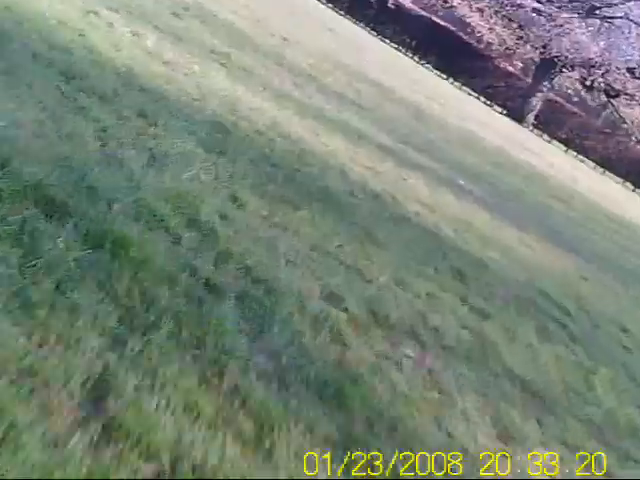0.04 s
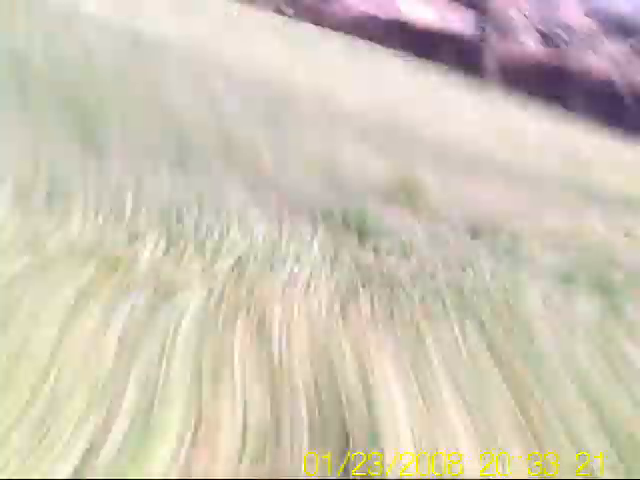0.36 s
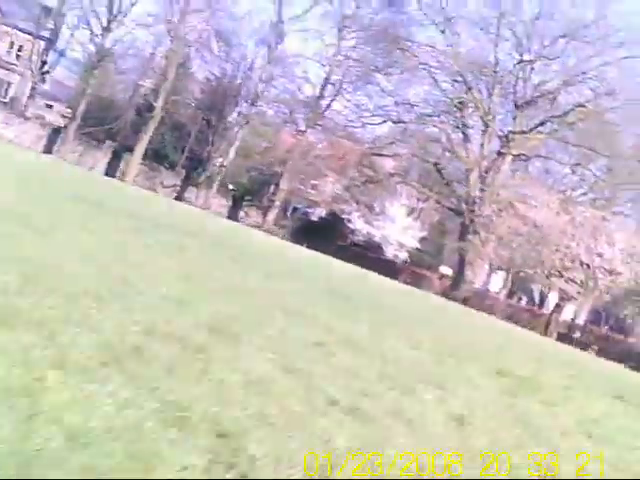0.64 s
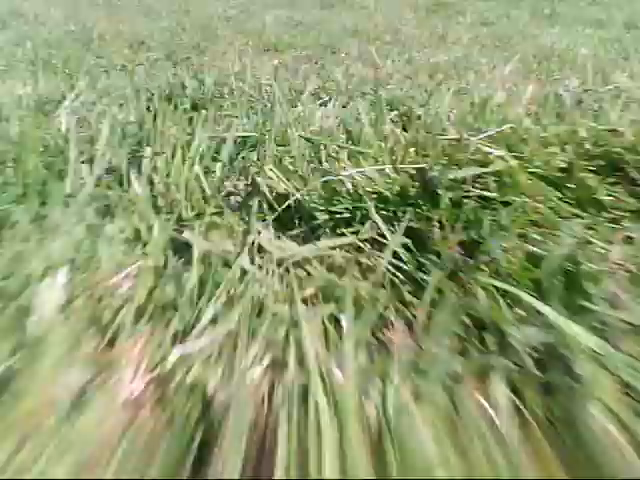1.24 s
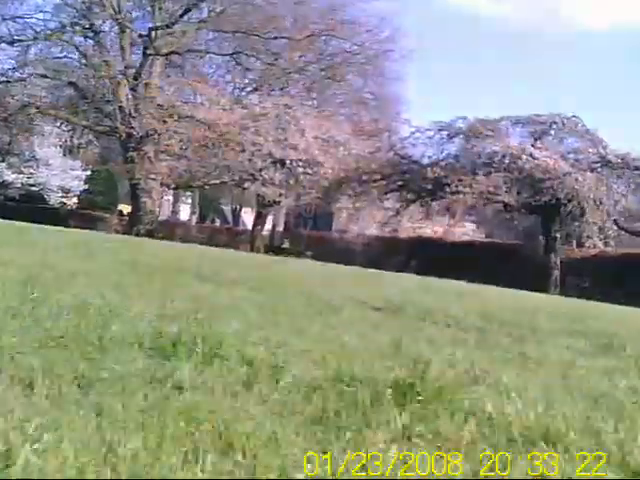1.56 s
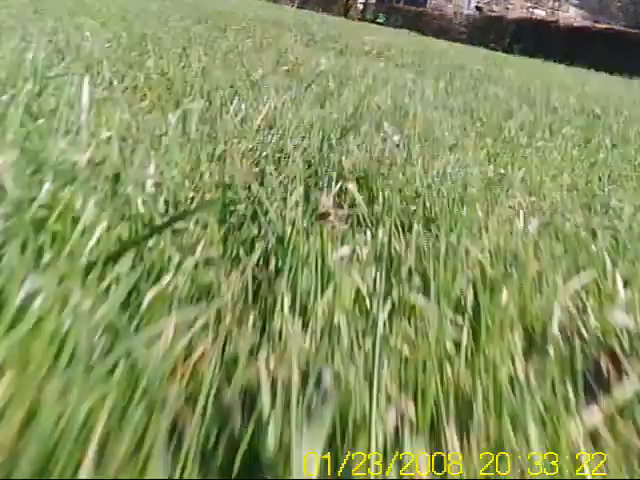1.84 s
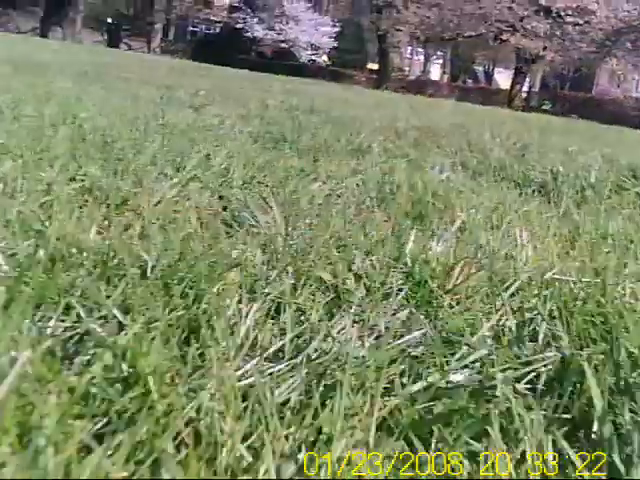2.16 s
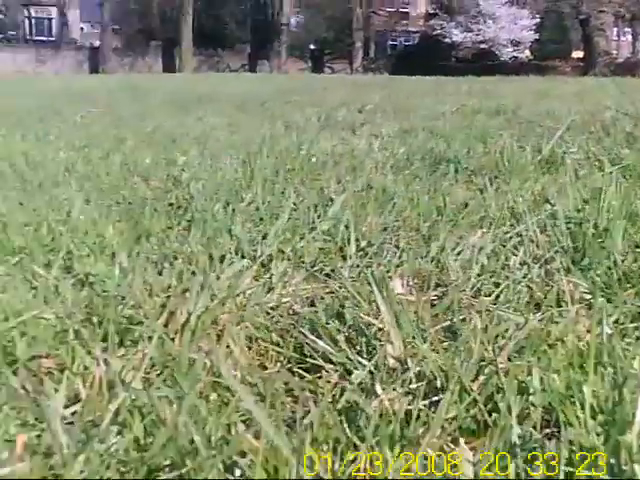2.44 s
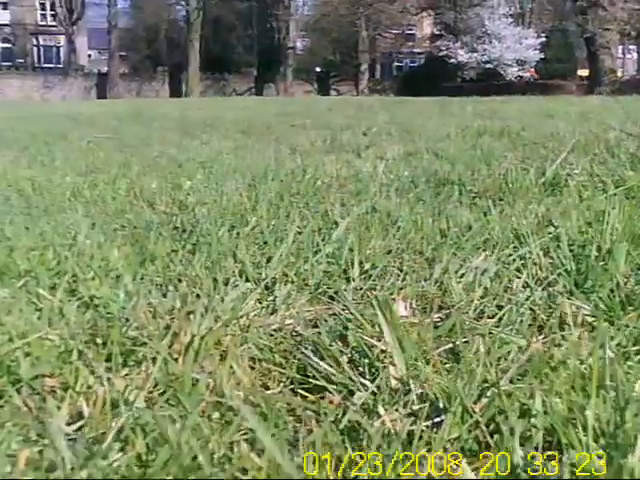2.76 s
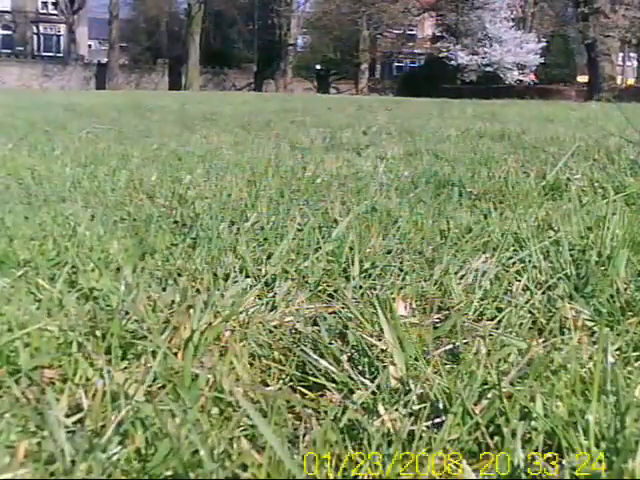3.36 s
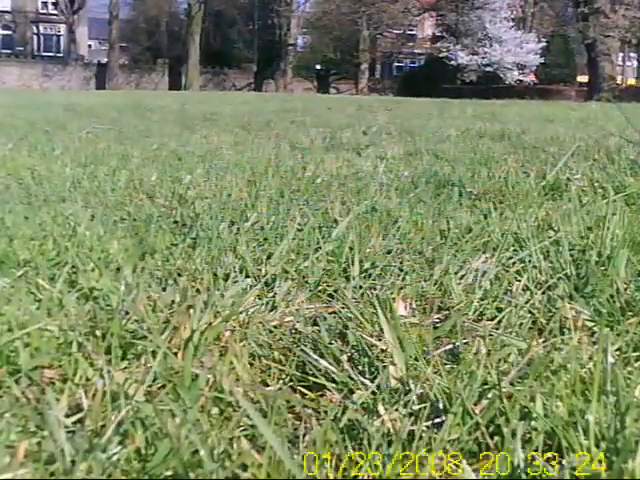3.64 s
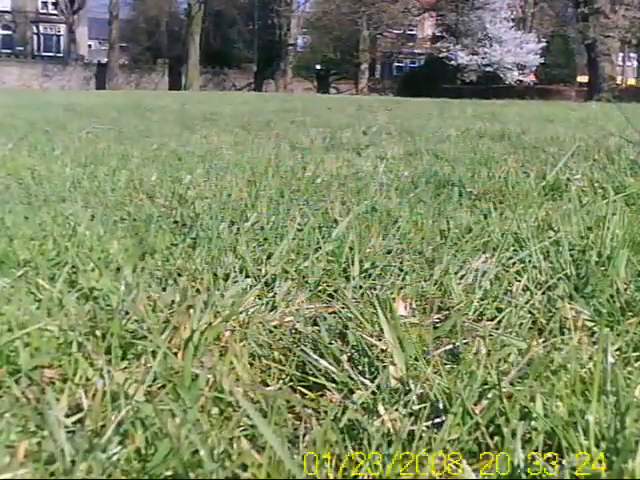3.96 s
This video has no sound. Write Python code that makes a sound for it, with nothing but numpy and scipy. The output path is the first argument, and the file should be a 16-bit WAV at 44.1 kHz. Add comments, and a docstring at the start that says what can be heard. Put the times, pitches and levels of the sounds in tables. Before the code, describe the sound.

Model aircraft landing hard on grass, with rushing wind, two skips and a short slide.

```python
"""A model plane lands on a lawn

Heard from a camera on board. Air buffets the microphone while the belly brushes the grass tips, hits
the turf, skips, hits again and slides to a stop. Stalks and clods knock on the body, and servos (small
steering motors) twitch. The camera adds a low electric flutter, hiss and one sharp tick."""
import sys
import numpy as np
from scipy import signal
from scipy.fft import rfft, irfft, next_fast_len
from scipy.io import wavfile
from scipy.ndimage import map_coordinates

SR = 44100
rng = np.random.default_rng(int(sys.argv[2]) if len(sys.argv) > 2 else 0)


def wav_out(sig):
    """Save sig, one row per channel (or a flat mono array), as 16-bit PCM at SR to the path in sys.argv[1]."""
    wavfile.write(sys.argv[1], SR, np.round(np.clip(np.atleast_2d(sig).T, -1, 1) * 32767).astype(np.int16))


N = 176400
T = np.arange(N) / SR


def amp(db):
    """Turn decibels into a volume multiplier."""
    return 10 ** (np.asarray(db) / 20)


def unit(x):
    """Scale a signal to an average strength (rms) of 1."""
    return x / np.sqrt(np.mean(x ** 2) + 1e-20)


def level(rows):
    """A volume curve through (time, level) points, silent outside them."""
    times, db = np.transpose(rows)
    return amp(np.interp(T, times, db, left=-120, right=-120))


def wobble(rate):
    """A smooth curve through `rate` random values a second."""
    return map_coordinates(rng.standard_normal(int(N * rate / SR) + 4), [T * rate])


def filtered(x, response):
    """Multiply each frequency in x by response(frequency)."""
    size = next_fast_len(N + SR // 2)
    return irfft(rfft(x, size) * response(np.fft.rfftfreq(size, 1 / SR)), size)[:N]


def coloured(x, colour):
    """Give x a colour (its balance of low and high frequencies), at strength 1."""
    freqs, db = np.transpose(colour)
    return unit(filtered(x, lambda hz: amp(np.interp(np.log(hz + 1), np.log(freqs), db))))


def noise(colour):
    """Steady noise with the given colour."""
    return coloured(rng.standard_normal(N), colour)


def grains(per_s, spread_db, smooth_db):
    """Tiny random impacts over a smooth rub."""
    hits = (rng.random(N) < per_s / SR) * rng.choice([-1, 1], N)
    sizes = amp(spread_db * np.clip(rng.standard_normal(N), -2, 2))
    return unit(unit(hits * sizes) + amp(smooth_db) * rng.standard_normal(N))


def strokes(rows, edge_s):
    """A volume curve that fades in and out for each (start, length, level) row."""
    curve = np.zeros(N)
    for start, length, db in rows:
        ramp = np.clip(np.minimum(T - start, start + length - T) / edge_s, 0, 1)
        curve += amp(db) * np.sin(np.pi / 2 * ramp) ** 2
    return curve


# Loudness of the rushing air and of its low buffeting (time [s], level [dB])
RUSH_LEVELS = [(0, -31.5), (.06, -33.5), (.25, -29), (.34, -28.5), (.40, -30.5), (.53, -27.5), (.64, -37),
               (.78, -39.5), (.87, -42), (1.0, -41.5), (1.2, -37), (1.3, -39.5), (1.42, -38), (1.6, -50),
               (1.7, -34), (1.85, -48), (2.1, -53), (2.5, -63)]
BUFFET_LEVELS = [(0, -15.5), (.08, -23), (.28, -22.5), (.38, -11.5), (.5, -16.5), (.66, -17), (.71, -22.5),
                 (.92, -32.5), (1.1, -29), (1.22, -24.5), (1.3, -16.5), (1.38, -22.5), (1.62, -38),
                 (1.71, -22.5), (1.9, -31.5), (2.1, -33.5), (2.5, -65)]
# Their colours (frequency [Hz], relative level [dB])
RUSH_COLOUR = [(60, -12.5), (130, 1.5), (220, -1), (400, -7.5), (700, -16.5), (1400, -22), (2500, -31.5),
               (4000, -40.5), (6000, -53.5), (15000, -74.5)]
RUMBLE_COLOUR = [(5, 13.5), (20, -4.5), (60, -3), (110, -13), (200, -19), (500, -57), (2000, -100)]

def wind():
    """Swirling air rushes past the microphone and shakes it, dying away as the plane slows."""
    rush = noise(RUSH_COLOUR) * level(RUSH_LEVELS) * amp(0.66 * wobble(25) + 1.8 * wobble(140))
    buffeting = noise(RUMBLE_COLOUR) * level(BUFFET_LEVELS) * amp(1.2 * wobble(22))
    return rush + buffeting


# Tones in the flutter (multiple of the lowest tone, relative level [dB])
FLUTTER_TONES = [(1, 4.5), (2, -1.5), (3, -12.5), (4, -25), (5, -31.5), (6, -43.5)]
# Colour of the hiss (frequency [Hz], relative level [dB])
HISS_COLOUR = [(35, -43), (60, 0), (139, -6), (171, -15.5), (298, -19.5), (327, -22), (403, -24),
               (613, -31.5), (688, -29.5), (3580, -43), (4030, -40.5), (15500, -49.5)]

def camera_noise(flutter_hz=23.47, whine_hz=3840):
    """The camera's electronics make an uneven low flutter, a hiss and a faint whine."""
    cycles = flutter_hz * T + .13 * wobble(7)
    flutter = np.zeros(N)
    for multiple, db in FLUTTER_TONES:
        volume = amp(db + 0.65 * wobble(7.6))
        flutter += volume * np.sin(2 * np.pi * multiple * (cycles + 0.0475 * wobble(15)))
    whine = filtered(rng.standard_normal(N), lambda hz: np.exp(-((hz - whine_hz) / 70) ** 2))
    hiss = noise(HISS_COLOUR) * amp(-46.5 + 0.98 * wobble(12))
    return amp(-34) * unit(flutter) + hiss + amp(-81) * unit(whine)


# Light touches of the grass (start [s], length [s], level [dB])
TIP_TOUCHES = [(.11, 0.23, -53.5), (.905, .15, -44), (1.092, 0.16, -45), (1.60, 0.094, -55)]
# Their colour (frequency [Hz], relative level [dB])
TIP_COLOUR = [(500, -10.5), (1200, -7.5), (1850, 2.5), (2900, -8.5), (4100, -7.5), (4800, -11),
              (6200, -8.5), (9000, -14), (11000, -21.5), (13000, -19), (15500, -17)]

def grass_tips():
    """Grass tips brush the belly as it skims over them."""
    rustle = coloured(grains(per_s=5000, spread_db=3.5, smooth_db=-4), TIP_COLOUR)
    return rustle * strokes(TIP_TOUCHES, edge_s=0.057) * amp(1.1 * wobble(80))


def scrape(levels, colour, blades, rough_db, treble_hz=3000, sway_db=1.33):
    """Grass blades flick along the belly, in tufts that rasp more or less brightly."""
    rub = coloured(blades, colour)
    treble = filtered(rub, lambda hz: hz ** 4 / (hz ** 4 + treble_hz ** 4))
    rub = unit(rub - treble + treble * amp(sway_db * wobble(35)))
    roughness = amp(rough_db * unit(wobble(70) + wobble(260)))
    return rub * level(levels) * roughness


# Loudness of the three scrapes on the turf (time [s], level [dB])
FIRST_HIT_LEVELS = [(.296, -45.5), (.304, -24), (.318, -18), (.335, -15.5), (.352, -15), (.363, -21),
                    (.392, -37.5), (.425, -37), (.455, -42.5), (.47, -67)]
SECOND_HIT_LEVELS = [(1.24, -50), (1.256, -43), (1.272, -23), (1.298, -14.5), (1.318, -22), (1.345, -35.5),
                     (1.40, -40.5), (1.445, -42.5), (1.50, -51), (1.53, -62)]
LAST_SLIDE_LEVELS = [(1.69, -49.5), (1.734, -28.5), (1.816, -20.5), (1.828, -20.5), (1.842, -25.5),
                     (1.9, -27.5), (2.025, -25.5), (2.138, -34), (2.21, -28), (2.27, -33), (2.32, -33.5),
                     (2.38, -36.5), (2.45, -46), (2.53, -66)]
# Their colours: the faster, the brighter (frequency [Hz], relative level [dB])
FIRST_HIT_COLOUR = [(94, -28.5), (160, 0.5), (319, -9), (409, -4), (544, -18.5), (635, -9.5), (1020, -12),
                    (2160, -2.5), (2380, -5), (7070, -10.5), (8730, -19), (9610, -19.5), (13300, -21.5),
                    (14600, -18.5), (15500, -20.5)]
SECOND_HIT_COLOUR = [(120, -32), (200, -6), (479, -4.5), (544, -12.5), (607, -3), (742, -13.5),
                     (1010, -5.5), (1260, -6), (1380, 0.5), (2170, -0.5), (2900, -5), (3480, -4.5),
                     (6240, -9.5), (8350, -19.5), (15500, -23.5)]
LAST_SLIDE_COLOUR = [(130, -43), (220, -13.5), (293, -9.5), (389, -8), (607, -12.5), (663, -9.5),
                     (882, -13), (1330, -5), (1480, -2), (1930, -2.5), (2520, -1), (2860, -10),
                     (3350, -3.5), (5230, -12), (6480, -9.5), (7340, -16), (11100, -26.5), (14700, -20.5),
                     (15500, -22.5)]

def belly_scrapes():
    """The belly skips off the turf twice, then slides to a stop."""
    first = scrape(FIRST_HIT_LEVELS, FIRST_HIT_COLOUR,
                   grains(per_s=4400, spread_db=0, smooth_db=-3.5), rough_db=1.5)
    second = scrape(SECOND_HIT_LEVELS, SECOND_HIT_COLOUR,
                    grains(per_s=3000, spread_db=5, smooth_db=0), rough_db=1.54)
    slide = scrape(LAST_SLIDE_LEVELS, LAST_SLIDE_COLOUR,
                   grains(per_s=2800, spread_db=3, smooth_db=-3.5), rough_db=0.33)
    return first + second + slide


# The belly presses into the turf (time [s], relative level [dB])
TURF_PUSHES = [(0.344, -16.5), (1.299, -20), (1.827, -26.5)]
# Colour of the thump (frequency [Hz], relative level [dB])
TURF_COLOUR = [(30, 5), (70, -2), (110, -6), (180, -5), (330, -9), (520, -22.5), (1200, -51.5)]

def thumps(width_s=.014):
    """A short, dull push each time the belly digs in."""
    swells = sum(amp(db) / 2 * np.exp(-((T - at) / width_s) ** 2 / 2) for at, db in TURF_PUSHES)
    return noise(TURF_COLOUR) * swells


# Hits from stalks and clods (time [s], peak level [dB], treble limit [Hz])
BODY_HITS = [(0.3464, 1, 15000), (0.3718, -6, 8000), (.383, -8.5, 12000), (.407, -17.5, 6000),
             (.4185, -20, 5100), (0.5421, -27, 3240), (.722, -41, 1790), (1.095, -40, 3030),
             (1.2407, -25.5, 3010), (1.3512, -9, 6500), (1.3794, -19, 4000), (1.392, -18, 3970),
             (1.62, -39.5, 2500), (1.638, -37.5, 4500), (1.682, -37, 3500), (1.70, -21, 2540),
             (1.8249, -7, 5000), (1.832, -14, 3004)]
# Tones the plane's body rings with (frequency [Hz], relative level [dB])
BODY_TONES = [(1560, -3), (1940, -8), (2200, -0.5), (2610, -3.5), (3450, -11), (3920, -8), (6200, -8)]

def knocks(ring_s=.010, crack_s=.006, rise_s=.00031, bass_limit_hz=708.4):
    """Each stalk or clod makes a crack and rings the body briefly; soft hits are dull."""
    track = np.zeros(N + SR)
    t = T[:SR // 25]
    for start, peak_db, treble_limit_hz in BODY_HITS:
        ring = sum(amp(db + 2 * rng.normal()) * np.sin(2 * np.pi * (hz * t + rng.random()))
                   for hz, db in BODY_TONES)
        ring = unit(ring) * amp(-60 * t / ring_s)
        crack = amp(5.5 - 60 * t / crack_s) * rng.standard_normal(len(t))
        hit = (ring + crack) * (1 - np.exp(-t / rise_s))
        band = signal.butter(2, [bass_limit_hz, treble_limit_hz], 'bandpass', fs=SR, output='sos')
        hit = signal.sosfilt(band, hit)
        track[round(start * SR):][:len(t)] += amp(peak_db) * hit / np.abs(hit).max()
    return track[:N]


# Servo twitches (start [s], length [s], level [dB])
SERVO_MOVES = [(.776, .06, -53), (2.575, 0.13, -60.5), (2.606, .054, -45.5), (2.694, .052, -52),
               (2.755, .035, -55.5)]
# Tones the servo's case rings with (frequency [Hz], width [Hz], relative level [dB])
CASE_TONES = [(396, 29, 3.5), (850, 300, -10), (1240, 80, 1.5), (1480, 110, 0), (1903, 54, 3.5),
              (2590, 120, -5.5), (3460, 80, 0), (4500, 230, -13), (5670, 120, -8), (6900, 600, -10.5),
              (8900, 900, -21), (13900, 2000, -21.5)]

def servos():
    """Gear teeth rattle in their case as a servo twitches a steering flap."""
    def case(hz):
        return sum((-1) ** k * amp(db) * 1j * hz * width / (centre ** 2 - hz ** 2 + 1j * hz * width)
                   for k, (centre, width, db) in enumerate(CASE_TONES))
    gears = unit(filtered(grains(per_s=1800, spread_db=7.5, smooth_db=-8), case))
    return gears * strokes(SERVO_MOVES, edge_s=0.0095) * amp(2.12 * wobble(150))


# Colour of the settling grass (frequency [Hz], relative level [dB])
FLAT_GRASS_COLOUR = [(150, -26), (380, -8), (650, -15), (1000, -8), (1500, 0.5), (2400, -1.5),
                     (3000, -10.5), (3480, -4.5), (4000, -12), (9000, -20), (15000, -30.5)]

def settling_grass(start_s=2.45, fall_db_per_s=23):
    """Flattened grass crackles softly as it settles after the stop."""
    fade = amp(-52.5 - fall_db_per_s * np.abs(T - start_s) + 2.7 * wobble(50)) * (T > start_s)
    return fade * coloured(grains(per_s=500, spread_db=2.5, smooth_db=-2.5), FLAT_GRASS_COLOUR)


def camera_tick(at_s=3.289, width_s=.00019, drift_s=.12):
    """One square tick, with a low pop as the camera's resting voltage jumps and drifts back."""
    gap_s = np.abs(T - at_s)
    tick = np.clip((width_s / 2 - gap_s) * SR + .5, 0, 1)
    pop = (T > at_s) * np.exp(-gap_s / drift_s)
    return amp(-25) * pop - amp(-11) * tick


def scene():
    """All the sounds add up at the one microphone on board."""
    landing = grass_tips() + belly_scrapes() + thumps() + knocks() + settling_grass()
    return (wind() + camera_noise() + landing + servos() + camera_tick())[None]


def record(dry, top_hz=15750):
    """The camera flattens peaks that are too loud and cuts off the highest treble."""
    return filtered(np.clip(dry[0], -1, 1), lambda hz: hz < top_hz)[None]


dry = scene()
out = record(dry)
wav_out(out)
```